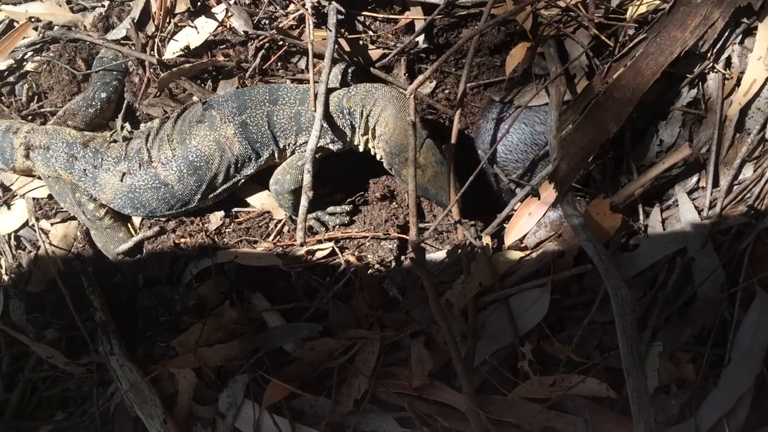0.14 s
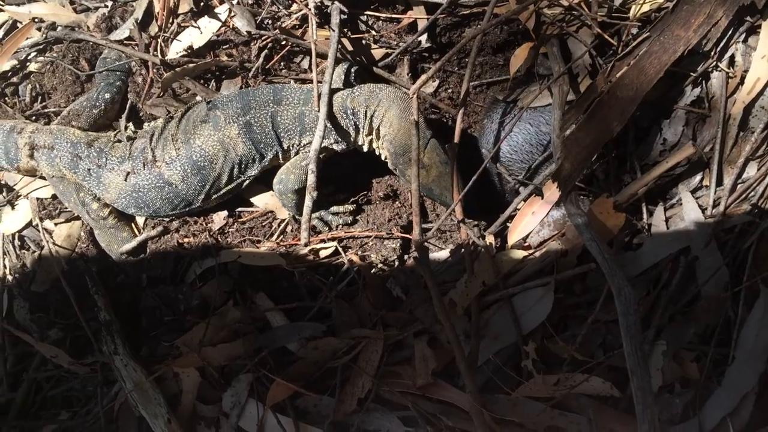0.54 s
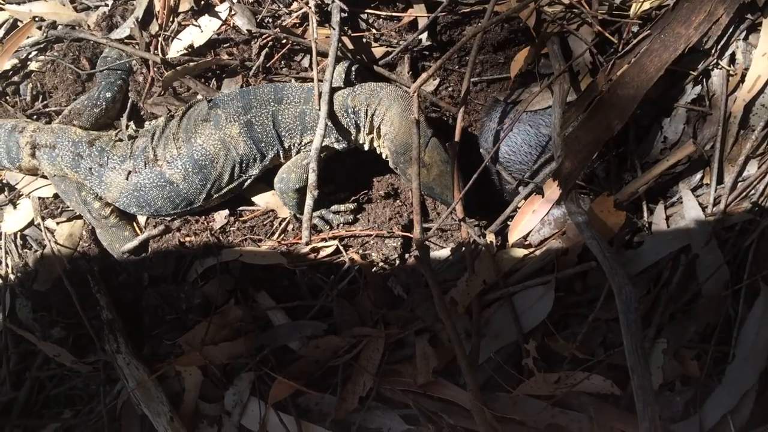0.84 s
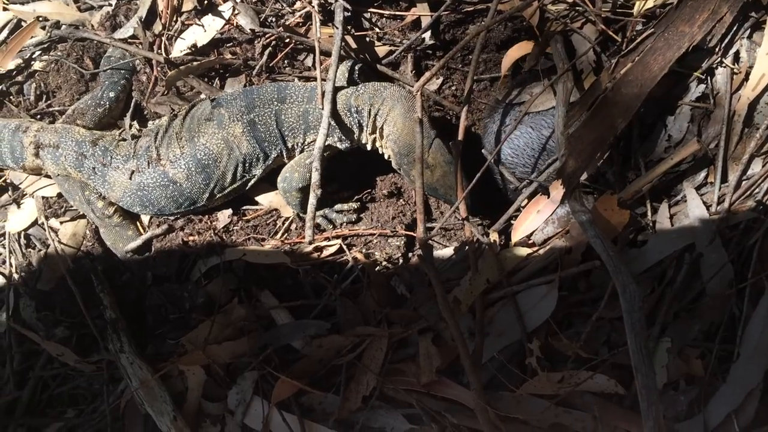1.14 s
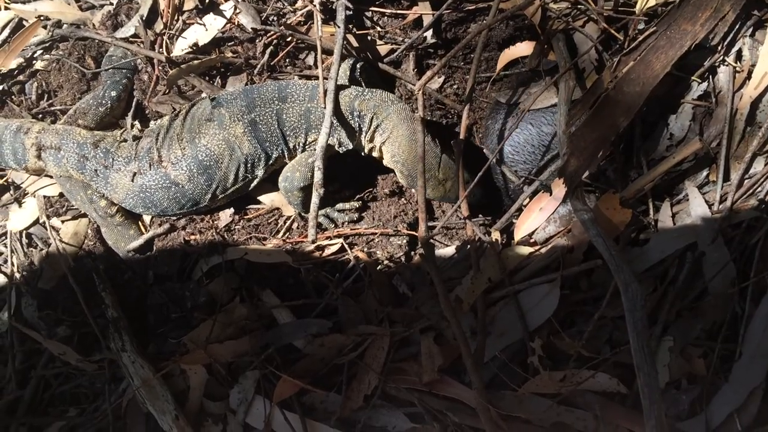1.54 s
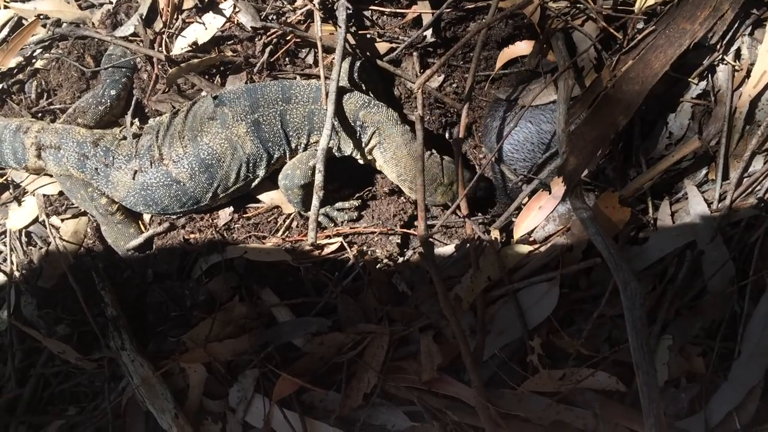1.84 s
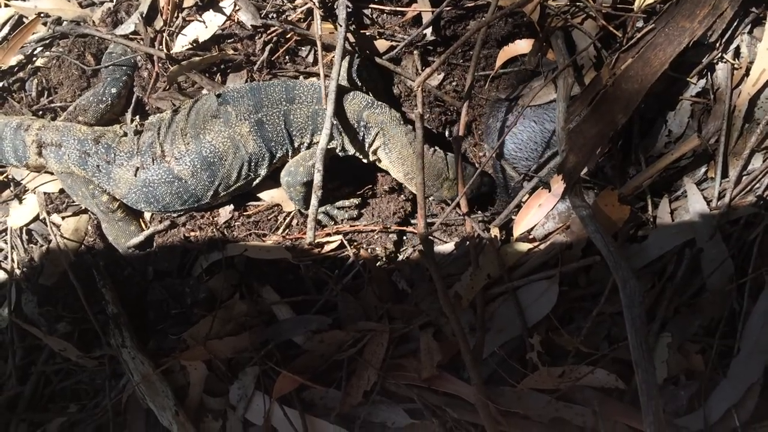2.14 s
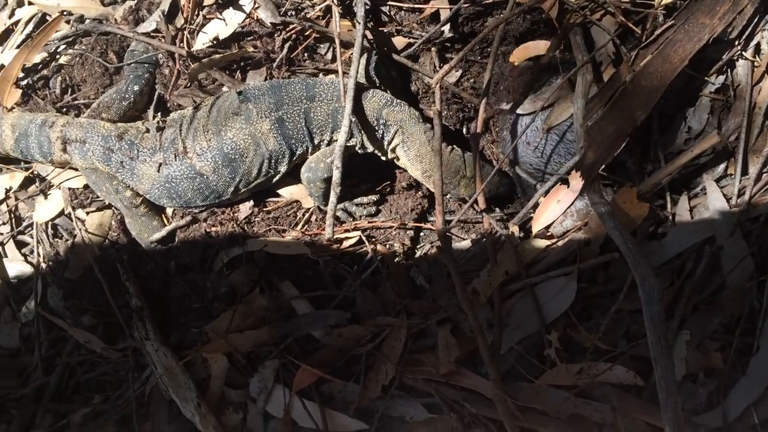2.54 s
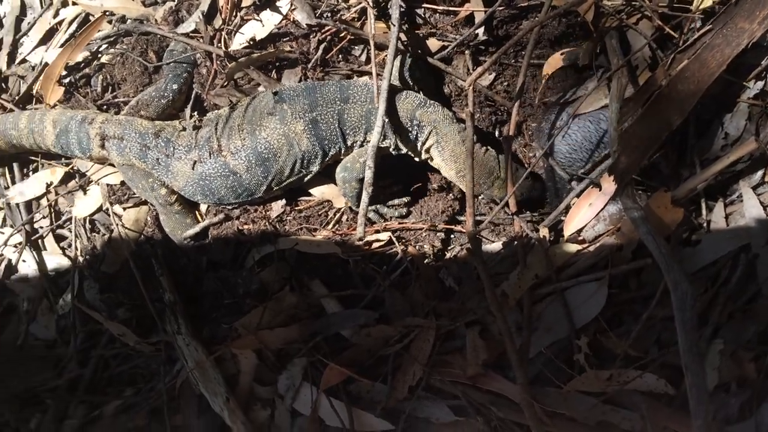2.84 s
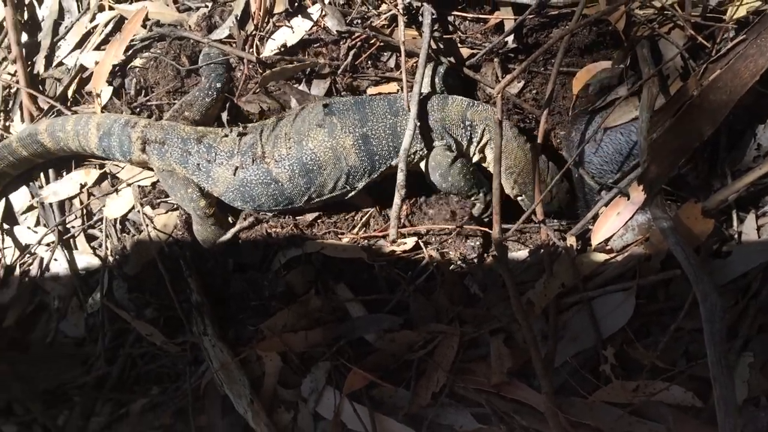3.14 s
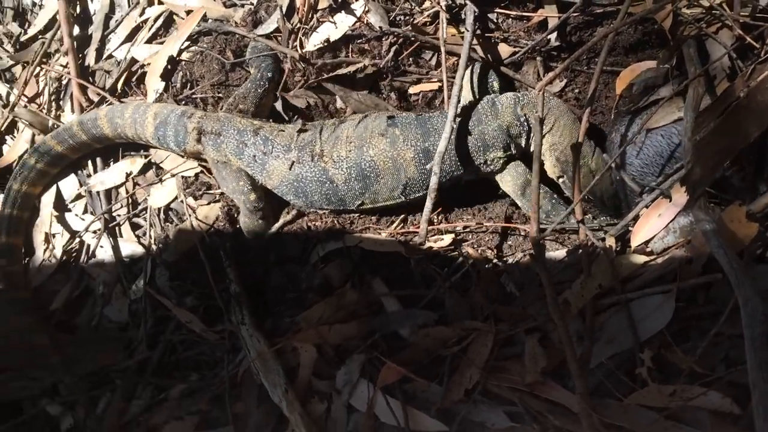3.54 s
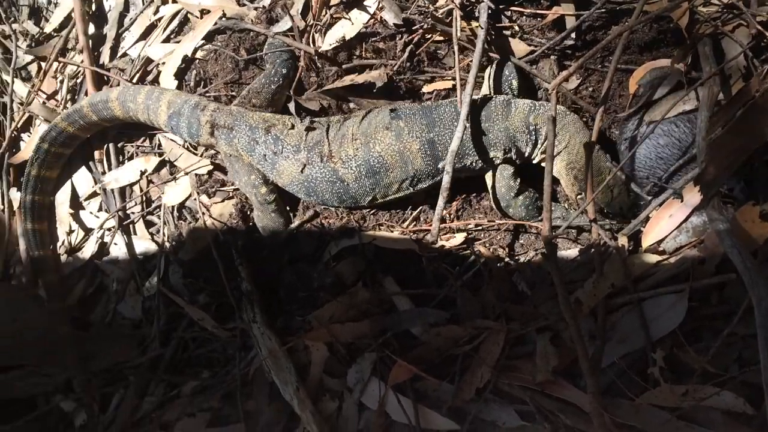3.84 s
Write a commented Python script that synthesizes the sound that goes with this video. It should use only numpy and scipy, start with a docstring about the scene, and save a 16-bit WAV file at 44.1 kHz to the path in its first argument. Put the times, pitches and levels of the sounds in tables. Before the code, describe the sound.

Twigs snap and dry leaves crunch as a large lizard digs, distant birds calling behind.

```python
"""Among trees, a large lizard noses and digs in dry leaf litter, close by, sparsely at first
and busily once it shifts its body; a colony of birds keeps up falling, nasal calls far off.
Twigs and sticks are short decaying tones, soil and air are filtered noise, and leaves are
filtered showers of tiny clicks. Each bird note is a gliding sine, some with overtones."""
import sys
import numpy as np
from scipy import signal
from scipy.fft import rfft, irfft
from scipy.io import wavfile
from scipy.ndimage import uniform_filter1d

SR = 44100
rng = np.random.default_rng(int(sys.argv[2]) if len(sys.argv) > 2 else 0)


def wav_record(signal):
    """Record a signal, one row per channel, as 16-bit PCM in the file named by sys.argv[1]."""
    frames = np.transpose(np.atleast_2d(signal))
    bounded = np.clip(frames, -1, 1)
    # unit amplitude maps onto the largest positive 16-bit level
    quanta = np.round(bounded * 32767).astype(np.int16)
    wavfile.write(sys.argv[1], SR, quanta)


N = 176400
TIME = np.arange(N) / SR


def amp(db):
    """Decibels to gain."""
    return 10 ** (np.asarray(db) / 20)


def unit(x):
    """Scale to a standard deviation of 1, so that a level can be set afterwards."""
    return x / (x.std() + 1e-12)


def colour(x, points):
    """Shape the spectrum through (pitch_hz, level_db) points, with no sound ahead of its cause."""
    hz, db = np.array(points).T
    size = 2 * len(x)
    f = np.maximum(np.fft.rfftfreq(size, 1 / SR), 1)
    log_gain = np.log(amp(np.interp(np.log(f), np.log(hz), db)))
    # Folding the cepstrum forward in time makes the filter minimum phase
    cepstrum = irfft(log_gain)
    cepstrum[1:size // 2] *= 2
    cepstrum[size // 2 + 1:] = 0
    return irfft(rfft(x, size) * np.exp(rfft(cepstrum)))[:len(x)]


def walk(rate, size):
    """Smooth random wander around 0, with rate new targets a second and a spread below 1."""
    step = max(int(SR / rate), 1)
    targets = rng.standard_normal(4096)
    path = np.interp(np.arange(size) / step, np.arange(4096), targets)
    return uniform_filter1d(path, step // 2 + 1)


def add(out, start_s, x):
    """Mix x into out from a start time, dropping what falls outside."""
    i = int(round(start_s * SR))
    x, i = x[max(-i, 0):], max(i, 0)
    out[i:i + len(x)] += x[:max(N - i, 0)]


def fade(t, t60_s):
    """Exponential decay that falls by 60 dB in t60_s."""
    return np.exp(-np.log(1000) * t / t60_s)


def echoes(x, t60_s, wet_db):
    """Many blurred reflections: a fading noise tail is added to the direct sound."""
    tail = rng.standard_normal(SR) * fade(TIME[:SR], t60_s)
    return x + amp(wet_db) * signal.fftconvolve(x, tail / np.linalg.norm(tail))[:N]


def swells(table):
    """Bell-shaped loudness curves from (centre_s, length_s, level_db) rows, summed in power."""
    power = sum(amp(2 * db) * np.exp(-(2 * (TIME - centre) / length) ** 2)
                for centre, length, db in table)
    return np.sqrt(power)


def grains(rate):
    """Tiny fractures as single clicks at random moments: many faint, few strong."""
    hit = rng.random(N) < rate / SR
    strength_db = 2.5 * np.minimum(rng.exponential(size=N), 4)
    return hit * rng.choice([-1, 1], N) * amp(strength_db)


CHIRP_WAVER = 0.01926  # slow pitch wander, as a share of the pitch
RASP, TWITTER_RASP = 0.0072, .06  # fast pitch jitter that roughens a note, same measure
CALL_EDGE_S, CHIRP_EDGE_S = 0.025, 0.0067  # fade in and fade out


def note(length, start_hz, end_hz, arch_hz, waver, rasp, edge_s):
    """Phase and envelope of one bird note that glides, bends by arch_hz midway and wavers."""
    u = np.linspace(0, 1, max(int(length * SR), 64))
    hz = start_hz + (end_hz - start_hz) * u + arch_hz * np.sin(np.pi * u)
    hz = hz * (1 + waver * walk(167.3, len(u)) + rasp * walk(1400, len(u)))
    edge = np.clip(np.minimum(u, 1 - u) * length / edge_s, 0, 1)
    flutter = amp(3.5 * walk(62.7, len(u)))
    return 2 * np.pi * np.cumsum(hz) / SR, np.sin(np.pi / 2 * edge) ** 2 * flutter


def whistles(table, rasp):
    """Plain sine notes from (start_s, length_s, start_hz, end_hz, level_db) rows."""
    out = np.zeros(N)
    for start_s, length, start_hz, end_hz, db in table:
        phase, env = note(length, start_hz, end_hz, 0, CHIRP_WAVER, rasp, CHIRP_EDGE_S)
        add(out, start_s, amp(db) * env * np.sin(phase))
    return out


# Tone colour of the still forest air: pitch_hz [Hz], relative level_db [dB per Hz]
AIR_COLOUR = [(15, -80), (25, 1), (54, -6), (139, -3), (264, -12.5), (404, -7.5), (673, -14), (1810, -12.5),
              (2430, -13), (2930, -2), (3730, -15.5), (4380, -15), (5880, -22.5), (9520, -28.5),
              (15000, -30.5)]


def air():
    """Still forest air: steady noise, strongest in the bass with a bump near 2900 Hz."""
    return amp(-65.5) * unit(colour(rng.standard_normal(N), AIR_COLOUR))


WOOD_T60_S = .42  # how long the trees echo
COLONY_PER_S, COLONY_DB = 68, -65
COLONY_HZ, COLONY_SPREAD_HZ, COLONY_GLIDE_HZ = 2941, 230, 345.7  # the last two are random spreads


def colony():
    """Many far birds: overlapping random notes and their echoes blur into one band."""
    out = np.zeros(N)
    count = int(COLONY_PER_S * N / SR)
    for k, (pitch, glide, lateness) in enumerate(rng.standard_normal((count, 3))):
        hz = COLONY_HZ + COLONY_SPREAD_HZ * pitch
        half_glide = COLONY_GLIDE_HZ * glide / 2
        phase, env = note(.09, hz + half_glide, hz - half_glide, 0, CHIRP_WAVER, RASP, CALL_EDGE_S)
        add(out, (k + lateness) / COLONY_PER_S - .06, env * np.sin(phase))
    blur = unit(echoes(out, WOOD_T60_S, 4.8))
    return amp(COLONY_DB + 1.3 * walk(6.9, N)) * blur  # slow swells


# Nasal bird calls: start_s [s], length_s [s], start_hz [Hz], end_hz [Hz], arch_hz [Hz],
# second_db [dB, second harmonic], then first_db, third_db, fourth_db [dB relative to the second]
CALLS = [(-.04, 0.099, 1642, 1650, 17.5, -59, -5.5, -27, -32),
         (.03, 0.085, 1584, 1506, 5, -61, -11, -12, -29),
         (.125, 0.14, 1367, 1290, -1.5, -57, -11.5, -14, -16.5),
         (0.239, .13, 1420, 1313, 1, -75, -21, -5, 0.5), (.32, 0.11, 1525, 1444, 92.5, -77, -18, 10, -10),
         (0.361, 0.094, 1480, 1367, -7.5, -70, -26, 3.5, -9), (.585, .1, 1900, 1680, 18, -75, 5, -26, -21),
         (.655, 0.12, 1778, 1386, -4.5, -57.5, -8, -19, -33),
         (.75, 0.069, 1440, 1453, -10.5, -53, -37, -17, -33),
         (.84, .12, 1667, 1527, 90, -61, -36, -35, -35),
         (.94, 0.12, 1547, 1490, -3.5, -62.5, -20, -24, -25),
         (1.42, 0.128, 1320, 1287, 1, -61, -18, -9, -8.5), (1.52, .14, 1710, 1700, 61.5, -66, 2.5, -6, -21),
         (1.65, .11, 1707, 1611, 9.5, -60, -6, -14, -25),
         (1.92, 0.18, 1776, 1633, 28.5, -63, -10, -13, -25), (2.04, 0.15, 1528, 1458, 11, -72, -3, -7, -23),
         (2.12, 0.13, 1552, 1200, 12.5, -65, -4, -19, -22),
         (2.32, 0.17, 1619, 1378, -18, -56.5, -16.5, -19, -31),
         (2.40, 0.13, 1410, 1364, -30.5, -52.5, -40, -20, -27),
         (2.50, 0.097, 1628, 1674, 43.5, -57.5, -26, -27, -34),
         (2.55, .1, 1650, 1568, 2, -54.5, -34, -24, -29), (3.0, 0.079, 1480, 1683, 30, -58, -19, -17, -24),
         (3.11, 0.11, 1750, 1720, 72, -64, -6, -26, -30),
         (3.199, .09, 1656, 1630, 5.5, -55.5, -11, -36, -41),
         (3.52, 0.12, 1480, 1182, 9.5, -53, -18, -9, -19.5),
         (3.56, 0.14, 1553, 1377, 1.5, -56.5, -10.5, -6.5, -24),
         (3.70, 0.064, 1650, 1493, 17, -58.5, -18, -28, -33),
         (3.79, 0.1, 1380, 1335, -8.5, -57, -15, -15, -15),
         (3.87, 0.13, 1422, 1403, 11.5, -52.5, -24, -14, -21)]
HOARSE_RAD, HOARSE_PER_S = 1.02, 760  # size and pace of the random phase wander


def calls():
    """Nearer birds: the second harmonic leads in most calls; phase wander makes the upper two hoarse."""
    out = np.zeros(N)
    for start_s, length, start_hz, end_hz, arch_hz, second_db, first_db, third_db, fourth_db in CALLS:
        phase, env = note(length, start_hz, end_hz, arch_hz, .011, RASP, CALL_EDGE_S)
        voice = amp(first_db) * np.sin(phase) + np.sin(2 * phase)
        for harmonic, db in ((3, third_db), (4, fourth_db)):
            wander = HOARSE_RAD * walk(HOARSE_PER_S, len(env))
            voice = voice + amp(db) * np.sin(harmonic * phase + wander)
        add(out, start_s, amp(second_db) * env * voice)
    return out


# How loudly the litter crunches under the body: time_s [s], level_db [dB]
CRUNCH_LEVEL = [(0, -71.5), (.7, -72), (.9, -69), (1.2, -70), (2.25, -70), (2.5, -58.5), (2.65, -63.5),
                (2.95, -60), (3.06, -58), (3.25, -63), (3.42, -55), (3.6, -60), (3.68, -53.5), (3.76, -62),
                (3.81, -47.5), (3.86, -69), (3.92, -71.5), (4, -55)]
# Tone colour of crunching litter: pitch_hz [Hz], relative level_db [dB]
CRUNCH_COLOUR = [(60, -8.5), (180, 5.5), (380, -2.5), (620, 4.5), (800, -2.5), (950, 3), (1080, -8),
                 (1300, 2), (1700, -8.5), (2800, 8), (3700, -16), (4400, -8.5), (5500, -24), (8500, -25.5),
                 (16000, -36)]
# Tone colour of brittle leaf edges: pitch_hz [Hz], relative level_db [dB]
CRACKLE_COLOUR = [(1000, -60), (3000, 13), (4300, 11), (5800, -8), (8500, -10.5), (12000, -17.5),
                  (16000, -15)]
GRAINS_PER_S, CRACKLE_PER_S = 2500, 340
CRACKLE_DB = -11  # relative to the crunch


def crunch():
    """Litter under the body: dense small fractures, with sparser bright crackles from leaf edges."""
    mass = unit(colour(grains(GRAINS_PER_S), CRUNCH_COLOUR))
    edges = unit(colour(echoes(grains(CRACKLE_PER_S), 0.018, 0), CRACKLE_COLOUR))
    level_db = np.interp(TIME, *np.array(CRUNCH_LEVEL).T) + 2 * walk(45, N)  # uneven pressing
    return (mass + amp(CRACKLE_DB) * edges) * amp(level_db)


# Short bird chirps: start_s [s], length_s [s], start_hz [Hz], end_hz [Hz], level_db [dB]
CHIRP_NOTES = [(.01, 0.031, 2050, 2470, -60.5), (.18, 0.041, 2100, 2500, -63), (.41, 0.01, 2900, 3050, -49),
               (.589, 0.012, 2900, 2950, -54), (1.111, 0.017, 2900, 2860, -51.5),
               (1.441, 0.022, 2630, 2780, -52), (1.48, 0.06, 2640, 2760, -59),
               (1.692, 0.025, 2020, 2440, -58), (1.87, 0.037, 2050, 2330, -59),
               (2.15, 0.011, 2900, 3160, -51), (2.325, 0.011, 2900, 3070, -46),
               (3.65, 0.01, 2913, 3070, -31.5)]


def chirps():
    """Short chirps: single sines that glide quickly, most of them upward."""
    return whistles(CHIRP_NOTES, RASP)


# Feet and snout pressing the soil: centre_s [s], length_s [s], level_db [dB]
SOIL_THUDS = [(.065, 0.031, -72), (.14, 0.022, -68.5), (.84, 0.017, -60), (.945, .03, -55.5),
              (1.295, 0.019, -59.5), (2.31, 0.027, -64), (2.39, 0.038, -63.5), (2.483, 0.029, -50.5),
              (2.585, 0.019, -52), (2.76, 0.069, -56.5), (2.89, 0.051, -59), (3.02, 0.067, -64),
              (3.13, 0.018, -54), (3.36, 0.15, -62), (3.525, 0.057, -54.5), (3.65, 0.014, -55),
              (3.735, 0.017, -55.5), (3.96, 0.014, -48)]
# Tone colour of soil: pitch_hz [Hz], relative level_db [dB]
SOIL_COLOUR = [(20, -51), (45, -4.5), (95, 12.5), (160, 1.5), (260, -16.5), (500, -43), (1500, -98)]


def thuds():
    """Soft soil gives under feet and snout: brief swells of deep noise."""
    return unit(colour(rng.standard_normal(N), SOIL_COLOUR)) * swells(SOIL_THUDS)


def ring(modes, t):
    """One blow on a set of decaying tones, each a little different every time; peak 1."""
    y = np.zeros(len(t))
    for k, (hz, db, t60_s) in enumerate(modes):
        pitch_luck, level_luck = rng.standard_normal(2)
        angle = 2 * np.pi * hz * (1 + .012 * pitch_luck) * t + np.pi * k / 2
        y += amp(db + 4.03 * level_luck) * fade(t, t60_s) * np.sin(angle)
    y = y * (1 - np.exp(-2 * t * modes[-1][0]))  # soften the very first instant
    return y / abs(y).max()


# Twig snaps: start_s [s], body_db, crack_db, tick_db, thump_db [dB: woody body, crack, bright
# tick, low thump], crack_ratio [times; raises the crack's pitch and shortens it equally]
TWIG_SNAPS = [(0.596, -70, -60, -55.5, -62, 0.89),  (2.685, -49, -59, -63, -57, 1.1),
              (2.740, -53, -55, -56, -65, 1.3), (2.8483, -34, -32.5, -39, -50, 1.07),
              (2.913, -48, -65, -63, -46.5, 1), (3.0196, -42.5, -42, -55, -44.5, 0.84),
              (3.031, -66, -60, -61, -77, 1.9), (3.090, -64, -45.5, -48, -66, 0.86),
              (3.136, -28.5, -30.5, -57, -40, 0.99), (3.1932, -20.5, -21, -57, -33, 0.93),
              (3.2046, -24.5, -38, -49, -42.5, 1), (3.2081, -32.5, -37, -58, -56, 0.97),
              (3.2937, -33.5, -34, -35.5, -47, 0.86), (3.353, -31, -38, -62, -66, 1.38),
              (3.3568, -35.5, -26.5, -62, -43, 1.07), (3.3605, -39, -42, -66, -41, 0.87),
              (3.367, -59, -42, -54, -62, 1.1), (3.415, -50, -43, -53, -53, 0.94),
              (3.4969, -14.5, -18.5, -28, -26.5, 0.99), (3.4998, -16.5, -16, -27.5, -36, 1.22),
              (3.5013, -24.5, -26.5, -27, -54, 1.06), (3.511, -39, -30, -52, -50, 0.97),
              (3.514, -47, -37, -56, -44, 1.1), (3.518, -42, -34, -59, -48, 0.94),
              (3.782, -47, -38.5, -47.5, -35.5, 0.79), (3.819, -40.5, -42, -51, -58, 0.92),
              (3.91, -40, -33, -46, -36, 0.91), (3.9215, -38.5, -47, -47, -51, 0.67),
              (3.9547, -34.5, -35, -35, -54, 0.95)]
# Woody ringing of a stick: pitch_hz [Hz], relative level_db [dB], t60_s [s to fall 60 dB]
BODY_TONES = [(427, -5, 0.017), (660, 1, 0.013), (986, -2.5, 0.0093), (1237, 1, 0.015), (1448, -8.5, 0.024),
              (2070, -17.5, 0.0098)]
# Sharper ringing of the crack, before crack_ratio: pitch_hz [Hz], relative level_db [dB], t60_s [s]
CRACK_TONES = [(2726, 0, 0.012), (3113, -8, 0.018), (3128, 0, 0.013), (4100, -5, 0.0049),
               (4435, -16, 0.012), (4950, -43, 0.0035)]
# Low ringing of the ground: pitch_hz [Hz], relative level_db [dB], t60_s [s]
THUMP_TONES = [(61, -1.5, 0.053), (111, -13, 0.024), (169.4, 9, 0.023), (298, -3.5, 0.035)]
# Tone colour of the bright tick: pitch_hz [Hz], relative level_db [dB]
TICK_COLOUR = [(2500, -27), (4500, 18.5), (6000, -1), (8500, 2.5), (11000, -7.5), (14500, -6), (20000, -42)]
# Tone colour of brushed leaves, also of straining fibres: pitch_hz [Hz], relative level_db [dB]
SWISH_COLOUR = [(300, -4), (1300, -8.5), (1800, -7), (3000, -0.5), (4500, -11), (6000, -17.5),
                (8500, -21.5), (12000, -36), (16000, -31)]
STRAIN_S, STRAIN_DB = 0.009, -19  # growth time; level relative to the crack
POP_S, POP_DB = 0.00015, -17.5  # blunt push of the break; level relative to the woody body


def twigs():
    """Fibres strain, then each snap is a pop and a bright tick that ring the stick and thump the ground."""
    out, t = np.zeros(N), TIME[:SR // 8]
    pop = np.exp(-t / POP_S) * (1 - t / POP_S / 2) * (1 - np.exp(-10 * t / POP_S))
    for start_s, body_db, crack_db, tick_db, thump_db, crack_ratio in TWIG_SNAPS:
        # Straining noise grows until the moment of the snap
        strain = colour(rng.standard_normal(len(t)) * np.exp(-t[::-1] / STRAIN_S), SWISH_COLOUR)
        add(out, start_s - t[-1], amp(crack_db + STRAIN_DB) * strain / abs(strain).max())
        tick = colour(rng.standard_normal(len(t)) * fade(t, 0.0042), TICK_COLOUR)
        snap = amp(tick_db) * tick / abs(tick).max()
        snap -= amp(body_db) * (ring(BODY_TONES, t) + amp(POP_DB) * pop / pop.max())
        snap -= amp(crack_db) * ring(CRACK_TONES, t * crack_ratio)
        snap -= amp(thump_db) * ring(THUMP_TONES, t)
        add(out, start_s, snap)
    return echoes(out, 0.081, -16.5)  # off the litter nearby


# Dull stick knocks: start_s [s], level_db [dB before the low-pass], drop_hz [Hz that the pitch
# starts above its end], decay_s [s], tail_db [dB, low tail relative to the knock]
STICK_KNOCKS = [(0.9633, -30, 1740, 0.0019, -14.5), (3.785, -27, 2746, 0.00083, -9.5),
                (3.9086, -34, 2800, 0.0005, -0.5)]
KNOCK_END_HZ, KNOCK_SAG_S, KNOCK_TAIL_S = 69, 0.000698, 0.0091  # half the drop is gone after the sag


def knocks():
    """A blunt knock sweeps down within milliseconds and leaves a low tail; a low-pass dulls its top."""
    out, t = np.zeros(N), TIME[:SR // 8]
    for start_s, db, drop_hz, decay, tail_db in STICK_KNOCKS:
        pitch = KNOCK_END_HZ + drop_hz / (1 + t / KNOCK_SAG_S)
        hit = np.exp(-t / decay)
        tail = amp(tail_db) * np.exp(-t / KNOCK_TAIL_S) * (1 - hit)
        sweep = (hit + tail) * np.sin(2 * np.pi * np.cumsum(pitch) / SR)
        blunt = signal.butter(5, 1.1 * drop_hz, fs=SR, output="sos")
        add(out, start_s, -amp(db) * signal.sosfilt(blunt, sweep))
    return out


# Leaves brushed aside: centre_s [s], length_s [s], level_db [dB]
LEAF_SWISHES = [(1.008, 0.032, -58), (1.133, 0.0059, -62), (1.811, 0.013, -57.5), (2.545, 0.041, -57.5),
                (3.07, 0.17, -67), (3.63, 0.09, -61.5), (3.895, 0.077, -54.5), (3.935, 0.018, -54)]


def swishes():
    """Leaves slide over each other: many tiny contacts heard as a brief rustle."""
    return unit(colour(grains(GRAINS_PER_S), SWISH_COLOUR)) * swells(LEAF_SWISHES)


# High, hoarse bird twitters: start_s [s], length_s [s], start_hz [Hz], end_hz [Hz], level_db [dB]
TWITTER_NOTES = [(1.86, 0.16, 5970, 6100, -75), (1.90, 0.07, 7440, 8160, -75),
                 (2.08, 0.085, 6720, 6600, -78), (2.135, 0.028, 6700, 7500, -72),
                 (2.145, .06, 10500, 8940, -75), (2.17, .055, 8350, 7600, -68.5),
                 (2.28, 0.026, 6850, 7400, -73), (2.295, 0.04, 11400, 9700, -78)]


def twitters():
    """High twitters: gliding sines made hoarse by strong, fast pitch jitter."""
    return whistles(TWITTER_NOTES, TWITTER_RASP)


def scene():
    """The digging in front; still air, the colony and nearer birds echoed by the trees behind."""
    birds = echoes(calls() + chirps() + twitters(), WOOD_T60_S, -5.5)
    digging = crunch() + thuds() + twigs() + knocks() + swishes()
    return (air() + colony() + birds + digging)[None]


def record(dry):
    """A steep low-pass leaves very little above 15400 Hz."""
    return signal.sosfilt(signal.ellip(10, .2, 70, 15400, fs=SR, output="sos"), dry)


dry = scene()
out = record(dry)
wav_record(out)
```